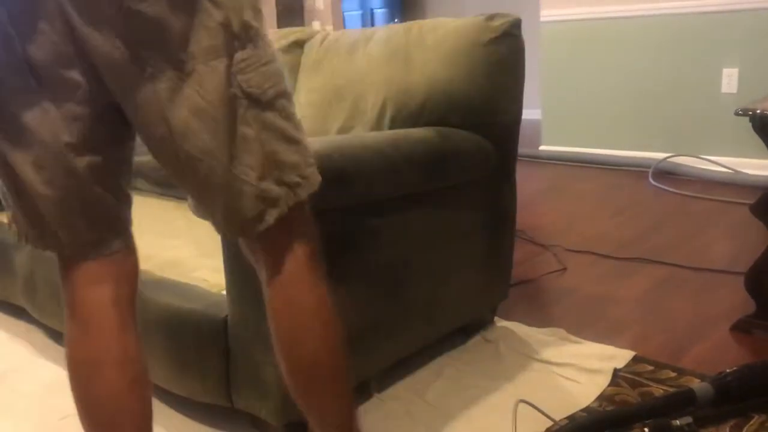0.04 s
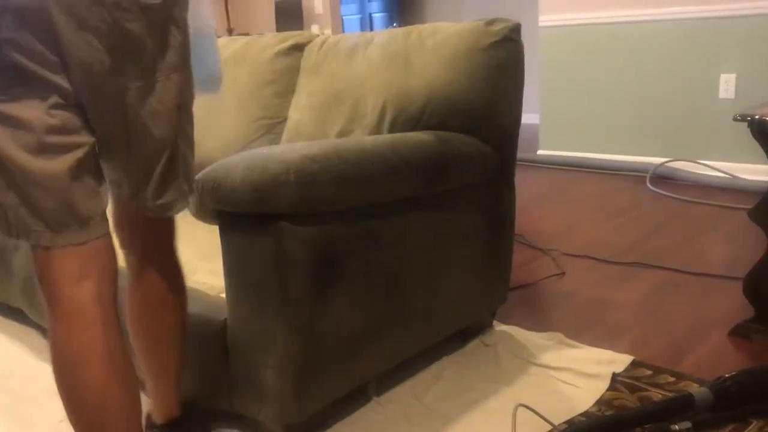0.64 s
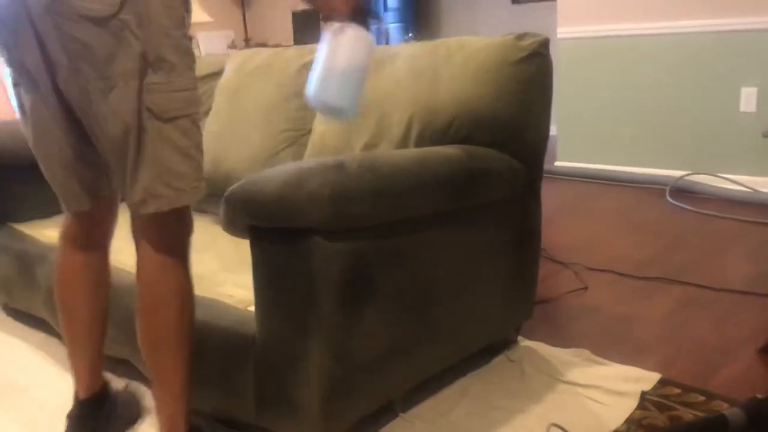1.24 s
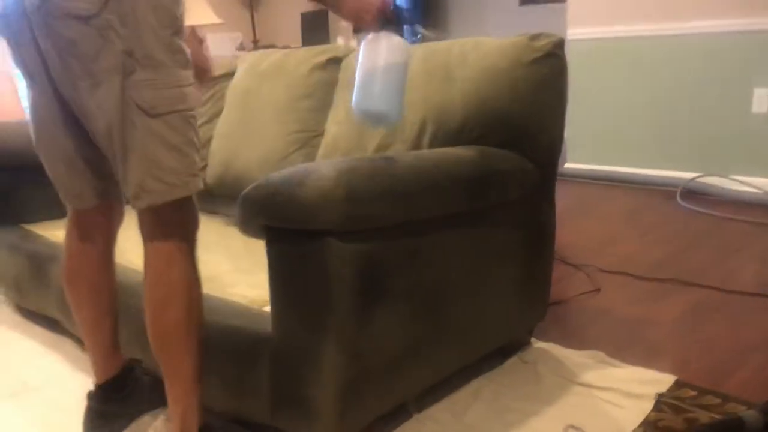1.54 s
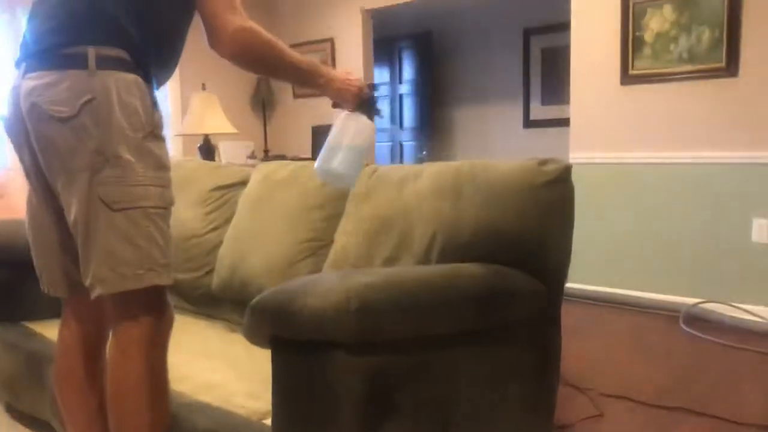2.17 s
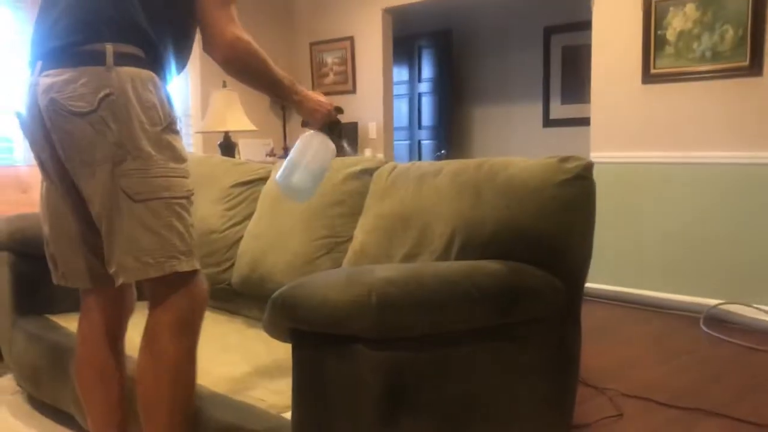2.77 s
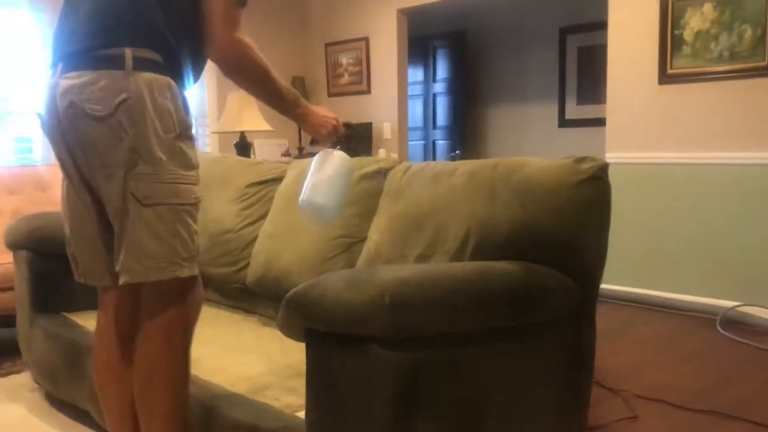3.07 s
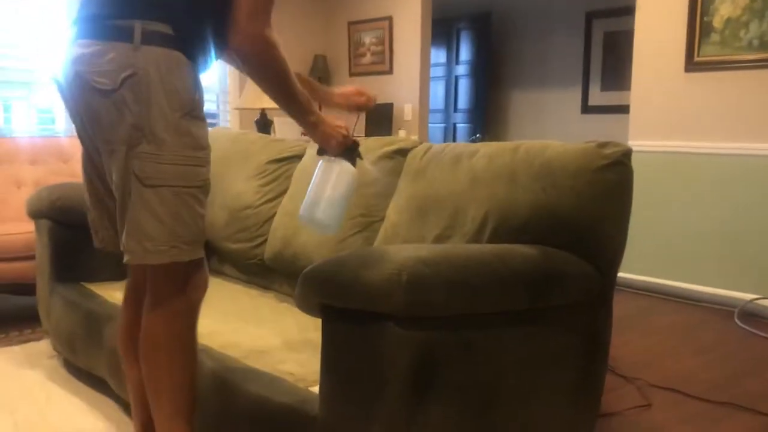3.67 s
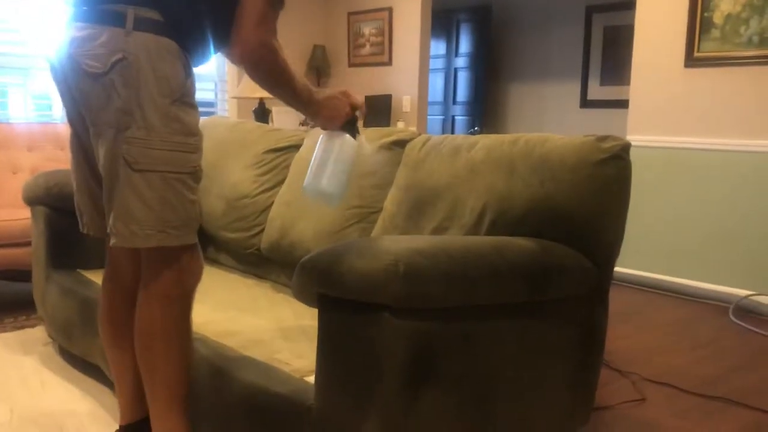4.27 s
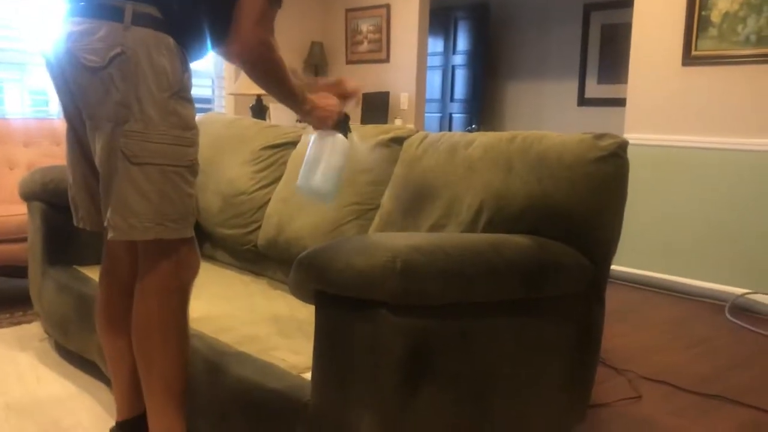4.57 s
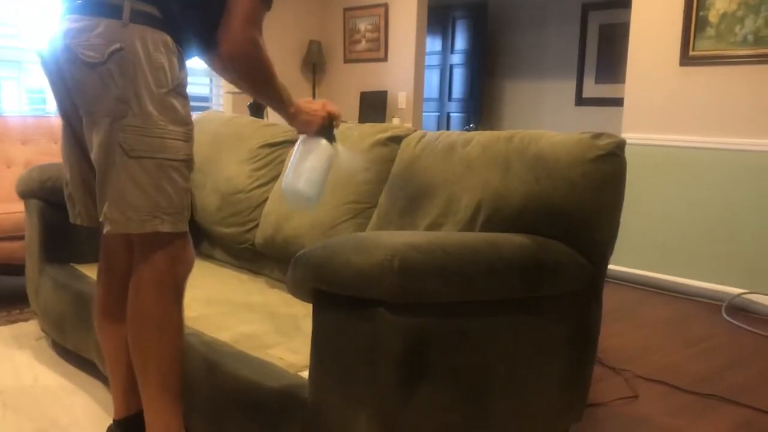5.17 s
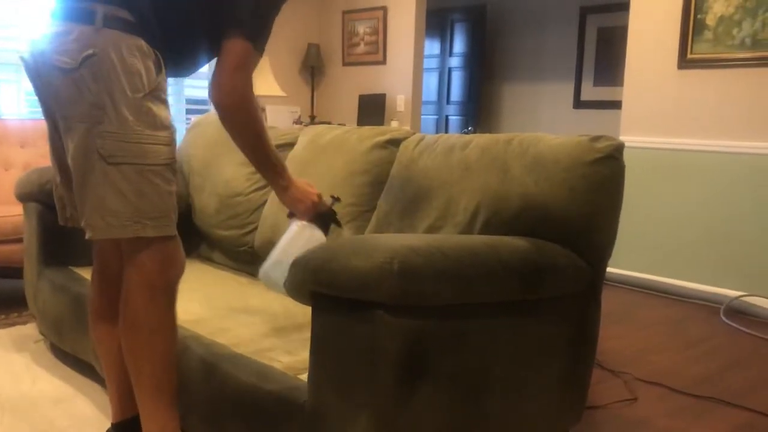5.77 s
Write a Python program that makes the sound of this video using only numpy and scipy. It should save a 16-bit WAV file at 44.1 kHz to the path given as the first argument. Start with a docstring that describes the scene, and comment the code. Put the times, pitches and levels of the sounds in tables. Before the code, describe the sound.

An upholstery cleaning machine runs throughout in a living room, a steady hissing rush of air with thin high whistles over a low motor hum. A plastic spray bottle knocks lightly once, then a high suction whistle catches, sinks a little and fades. The hum drops slightly in pitch, and the bottle knocks four more times near the end. The hand-held phone microphone adds soft rumble and bumps.

```python
"""An upholstery extractor's vacuum motor runs in a living room, heard from a hand-held phone.
From the start, air rushes through the turbine and rings housing and hose; thin whistles and a rotor
hum sit on it, and the moving phone rumbles softly. At 1 s a hand sprayer knocks lightly.
At 1.3 s a suction whistle catches, then sinks and fades. From 2.7 s the rotor slows under load.
From 4 s the sprayer knocks four more times."""
import sys
import numpy as np
from scipy import signal
from scipy.fft import rfft, irfft
from scipy.io import wavfile

SR = 44100
rng = np.random.default_rng(int(sys.argv[2]) if len(sys.argv) > 2 else 0)


def digitize_waveform(pressure):
    """Quantize a signal to 16-bit integers and store it at the path in sys.argv[1].

    Rows of a 2-D input are taken as channels; values are limited to [-1, 1].
    """
    field = np.atleast_2d(pressure).T
    bounded = np.clip(field, -1, 1)
    quanta = np.round(bounded * 32767).astype(np.int16)
    wavfile.write(sys.argv[1], SR, quanta)


N = 256662
TIME_S = np.arange(N) / SR
FREQ_HZ = np.maximum(np.arange(N // 2 + 1) * SR / N, 1)

# phone turning across the room: time_s, bearing (about -1 to 1)
PHONE_BEARING = [(0, 1.1), (1.2, 1.3), (2.3, 0.27), (3.1, -0.9), (5.8, -.8)]


def undb(db):
    """Decibels to gain."""
    return 10 ** (np.asarray(db) / 20)


def curve(table):
    """A (time_s, value) table, interpolated per sample."""
    return np.interp(TIME_S, *np.transpose(table))


def since(start_s):
    """Seconds since start_s, 0 before it."""
    return np.maximum(TIME_S - start_s, 0)


def colour_db(points):
    """A spectrum of straight lines over log frequency."""
    hz, db = np.transpose(points)
    return np.interp(np.log(FREQ_HZ), np.log(hz), db)


def bell(centre_hz, width_hz):
    """Spectral peak of height 1; width at half height."""
    return .5 ** np.minimum((2 * (FREQ_HZ - centre_hz) / width_hz) ** 2, 200)


def noise(gain):
    """Unit-rms noise shaped by a gain per frequency."""
    shaped = irfft(rfft(rng.standard_normal(N)) * gain, N)
    return shaped / np.std(shaped)


def walk(rate_hz):
    """Smooth random wander of spread 1."""
    return noise(bell(0, 2 * rate_hz))


def room_comb_db(echo_s, depth_db):
    """Wall echoes add and cancel: a fine ripple over the treble."""
    lag = np.minimum(TIME_S / echo_s, 20)
    ripple = rfft(rng.standard_normal(N) * lag * np.exp(-lag)).real
    return depth_db * ripple / np.std(ripple) * FREQ_HZ / (FREQ_HZ + 1500)


def airflow(level_db=-21.5, ease_db_per_s=0.0534, low_cut_hz=48, places=5):
    """Turbulence rings the air path; echoes and shading shift as the phone moves."""
    # broad spectrum of the rush: freq_hz, relative_db
    rush = [(60,-20.5),(170,-22),(400,-18),(600,-15),(1150,-13.5),(1900,-20),(2450,-1.5),(3020,-18),(4200,-5.5),(5600,-5.5),(6850,-0.5),(7450,-12.5),(9100,-17.5),(11400,-24),(15600,-26.5)]
    # housing, hose and room resonances: centre_hz, width_hz, lift_db
    resonances = [(241.4, 22, 7.5), (297.4, 49, 6), (467, 14.6, 5.5), (541, 92, 6.5), (644, 49, 6.5),
                  (777, 69, 6.5), (826, 34, 5.5), (933, 22, 6), (1331, 57, 6.5), (1452, 91, 6.5),
                  (1560, 67, 9), (1647, 44, 9.5), (1732, 97, 9.5), (1855, 120, 10.5), (1987, 148, 11),
                  (2138, 63, 10), (2216, 29, 9.5), (2317, 60, 7), (2480, 28, -1.5), (2598, 45, 5.5),
                  (2747, 91, 6), (3310, 11, 4.5), (3590, 49, 6), (4344, 230, 2), (4608, 63, 6),
                  (5195, 340, 4), (6190, 790, 2.5), (8000, 980, 2.5), (9980, 200, 7.5), (12850, 1000, 5)]
    # bands the phone's body lifts or shades: centre_hz, width_hz, lift_db (at bearing 1)
    shaded_bands = [(2050,1000,0.57),(3060,500,-0.6),(4500,620,-0.9),(6900,910,1.5),(9100,4300,-1),(12300,1400,1.5),(14800,900,-1.3)]
    shape_db = colour_db(rush) + sum(db * bell(hz, width_hz) for hz, width_hz, db in resonances)
    shape_db += room_comb_db(echo_s=0.014, depth_db=2.07)
    low_cut = FREQ_HZ ** 6 / (FREQ_HZ ** 6 + low_cut_hz ** 6)
    position = np.linspace(0, places - 1, N)
    air = 0
    for place in range(places):  # crossfade; each place has its own echoes
        share = np.clip(1 - abs(position - place), 0, 1)
        local_db = shape_db + room_comb_db(echo_s=0.01, depth_db=1.5)
        air += np.sqrt(share) * noise(low_cut * undb(local_db))
    shading = undb(sum(db * bell(hz, width_hz) for hz, width_hz, db in shaded_bands)) - 1
    air += curve(PHONE_BEARING) * irfft(rfft(air) * shading, N)
    return air * undb(level_db - ease_db_per_s * TIME_S + 0.4 * walk(8.6))


def edge_whistles(swell_db=1.7, swell_rate_hz=0.78):
    """Edges in the air path whistle; each level follows the phone's bearing and swells at random."""
    # edge tones: pitch_hz, width_hz, level_db, lift_db (at bearing 1)
    tones = [(788,11,-53,-0.5),(2280,69,-51,2),(2717,14,-50,-7),(4400,52,-57,-4),(5220,17,-52,-5),(6360,26,-50,-5),(7110,35,-44,2),(10140,120,-54,-2)]
    bearing = curve(PHONE_BEARING)
    out = 0
    for pitch_hz, width_hz, level_db, lift_db in tones:
        tone = noise(bell(pitch_hz, width_hz))
        out += tone * undb(level_db + lift_db * bearing + swell_db * walk(swell_rate_hz))
    return out


def rotor_hum(rotor_hz=217.5, sag_from_s=2.7, sag_hz_per_s=2.05, wobble_hz=0.23, flutter_db=0.6):
    """The rotor shakes the case once a turn; standing waves swell each harmonic separately."""
    # fundamental: time_s, level_db
    first_levels = [(0,-49.5),(.9,-49.5),(1.6,-46.5),(2.4,-45),(3.1,-47.5),(3.7,-44),(4.5,-46.5),(5.8,-46.3)]
    # third harmonic: time_s, level_db
    third_levels = [(0,-43.5),(1.3,-46.5),(4.9,-46.5),(5.6,-53)]
    pitch_hz = rotor_hz - sag_hz_per_s * since(sag_from_s) + wobble_hz * walk(4.4)
    phase = 2 * np.pi * np.cumsum(pitch_hz) / SR
    first = np.sin(phase) * undb(curve(first_levels) + flutter_db * walk(6.3))
    third = np.sin(3 * phase) * undb(curve(third_levels) + flutter_db * walk(6.7))
    return np.sqrt(2) * (first + third)


def handling(rumble_db=-54, uneven_db=1.5, settle_s=3.2, calm_db_per_s=1.0, bump_width_s=0.065):
    """The phone rumbles and bumps in the hand, calming once it settles."""
    # rumble spectrum: freq_hz, relative_db
    rumble = [(15,-35),(28,-19),(43,-4),(55,0.5),(80,-2.5),(125,-0.5),(200,-12.5),(400,-32)]
    # bumps from steps and grip: peak_s, level_db
    bumps = [(.23,-47),(.81,-46),(.98,-50),(1.25,-45),(1.79,-47),(2.0,-43),(2.49,-47),(2.74,-48),(2.99,-46)]
    power = undb(rumble_db - calm_db_per_s * since(settle_s) + uneven_db * walk(5)) ** 2
    for peak_s, level_db in bumps:
        pulse = .5 ** np.minimum((2 * (TIME_S - peak_s) / bump_width_s) ** 2, 20)
        power += undb(level_db) ** 2 * pulse
    return np.sqrt(power) * noise(undb(colour_db(rumble)))


def sprayer(tick_t60_s=0.065, room_db=-15, room_t60_s=0.2):
    """Each knock ticks, rings the plastic bottle and dies away in the room."""
    # sprayer knocks: start_s, ring_db, tick_db, ring_t60_s
    knocks = [(.995,-31.5,-39,0.04),(4.042,-29.5,-34,0.08),(4.394,-39,-32,0.06),(4.948,-41,-26.5,0.036),(5.234,-42,-30,.04)]
    # bottle modes: pitch_hz, relative_db
    modes = [(905,-10),(940,8),(1040,0),(1235,3)]
    tick_noise = noise(bell(1020, 800))
    room_noise = noise(sum(undb(db) * bell(hz, 70) for hz, db in modes))
    out = 0
    for start_s, ring_db, tick_db, ring_t60_s in knocks:
        age_s = since(start_s)
        fade = -np.log(1000) * age_s
        ring = sum(undb(db) * np.sin(2 * np.pi * hz * age_s) for hz, db in modes)
        ring *= np.exp(fade / ring_t60_s)
        tail = undb(room_db) * room_noise * np.exp(fade / room_t60_s)
        tick = tick_noise * np.exp(fade / tick_t60_s)
        out += (TIME_S >= start_s) * (undb(ring_db) * (ring + tail) + undb(tick_db) * tick)
    return out


def suction_whistle(start_s=1.3, start_hz=4480, sag_hz_per_s=40, jitter_hz=9,
                    level_db=-36, attack_s=0.13, fade_db_per_s=5):
    """A thin whistle catches in the hose, sinks in pitch and fades into the rush."""
    age_s = since(start_s)
    pitch_hz = start_hz - sag_hz_per_s * age_s + jitter_hz * walk(30.3)
    phase = 2 * np.pi * np.cumsum(pitch_hz) / SR
    attack = np.minimum(age_s / attack_s, 1)
    gain = undb(level_db - fade_db_per_s * age_s + 2 * walk(6))
    return np.sqrt(2) * np.sin(phase) * attack * gain


def scene():
    """One microphone feeds both channels."""
    mono = airflow() + edge_whistles() + rotor_hum() + handling() + sprayer() + suction_whistle()
    return np.array([mono, mono])


def record(dry):
    """The phone cuts the top steeply."""
    cutoff_hz = 15750
    return signal.sosfilt(signal.ellip(12, .1, 80, cutoff_hz, fs=SR, output="sos"), dry)


dry = scene()
out = record(dry)
digitize_waveform(out)
```